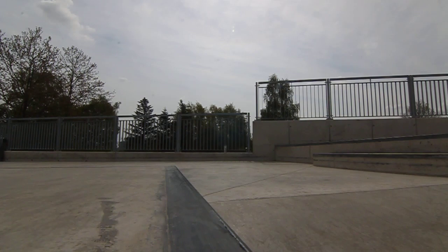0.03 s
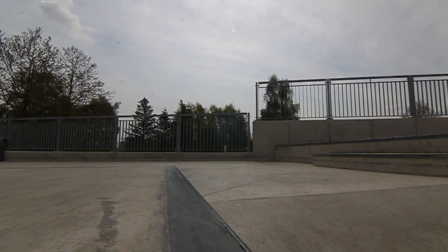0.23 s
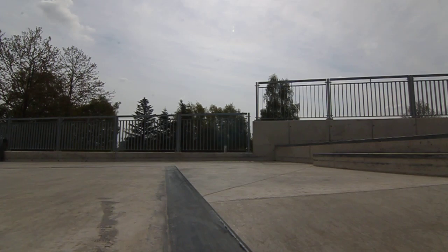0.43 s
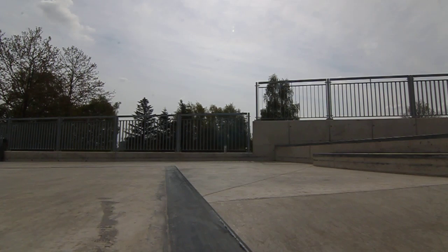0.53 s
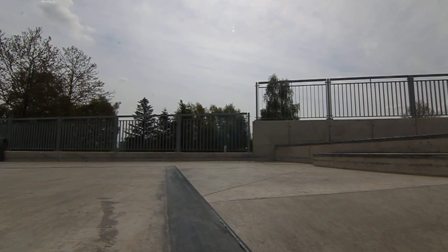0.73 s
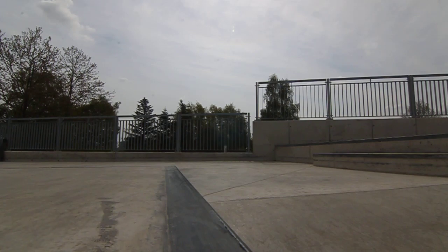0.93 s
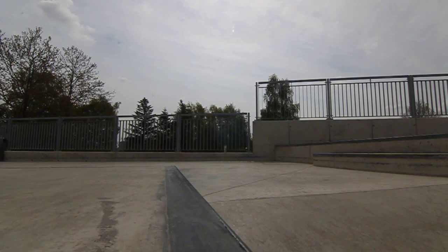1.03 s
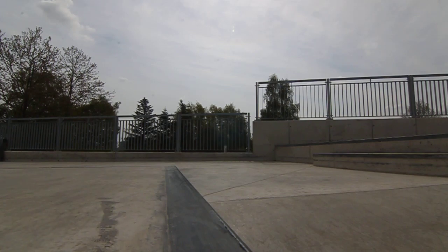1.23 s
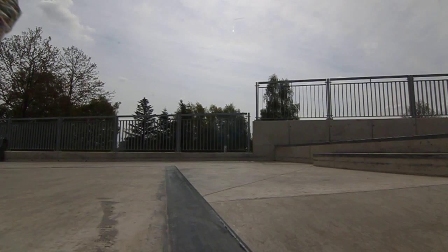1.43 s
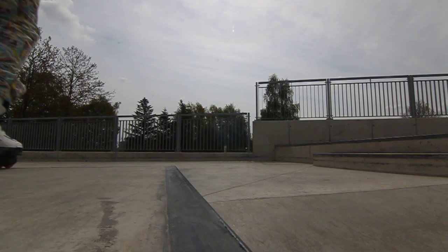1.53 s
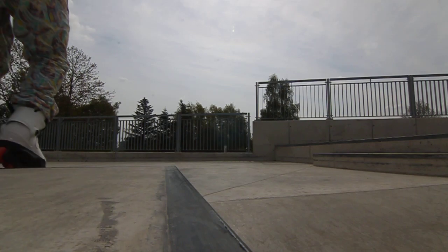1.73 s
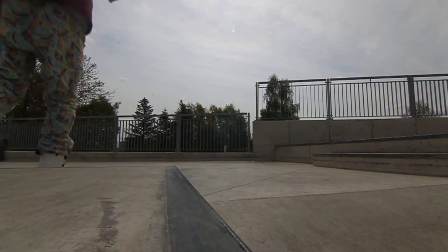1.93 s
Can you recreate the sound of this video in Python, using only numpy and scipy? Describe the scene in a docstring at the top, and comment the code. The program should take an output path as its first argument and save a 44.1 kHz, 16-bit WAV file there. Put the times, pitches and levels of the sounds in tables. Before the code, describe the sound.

Skate wheels roar across smooth concrete, clack over a joint, kick off and slam down outdoors

```python
"""Inline skate wheels roar over smooth concrete with crackling grit and a faint low rumble of wind.
The skates bump over a joint, scuff sideways, kick off in a jump and slap down one after the other.
A short squeak falls between the last blows; the loudest landing overloads the microphone.
Roar, grit and scuffs are filtered random grains, blows are damped modes plus noise, and the squeak
is a rough tone. Blows and squeak also scatter weakly from the park; wind and hush are filtered noise."""
import sys
import numpy as np
from scipy import signal
from scipy.fft import rfft, irfft
from scipy.io import wavfile
from scipy.ndimage import uniform_filter1d

SR = 44100
rng = np.random.default_rng(int(sys.argv[2]) if len(sys.argv) > 2 else 0)


def inscribe(sig):
    """Save sig as 16-bit PCM at rate SR to the path in sys.argv[1].

    A 1-D sig is mono; a 2-D sig holds one channel per row.
    Samples are clipped to [-1, 1] before scaling.
    """
    pcm = np.round(np.clip(np.atleast_2d(sig).T, -1, 1) * 32767)
    wavfile.write(sys.argv[1], SR, pcm.astype(np.int16))


N = 88200
T = np.arange(N) / SR


def undb(db):
    """Decibels to gain."""
    return 10 ** (np.asarray(db) / 20)


def unit(x):
    """Scale to rms 1."""
    return x / np.sqrt(np.mean(x ** 2))


def curve(table, axis=1):
    """One column of a table, joined by straight lines in time."""
    rows = np.array(table)
    return np.interp(T, rows[:, 0], rows[:, axis])


def colour(x, points):
    """Shape a sound with a spectrum of (Hz, dB) points, straight in log frequency; rms 1."""
    hz, db = np.array(points).T
    f = np.fft.rfftfreq(N, 1 / SR) + 1e-6
    gain = undb(np.interp(np.log(f), np.log(hz), db))
    return unit(irfft(rfft(x) * gain, N))


def band(x, hz, width_hz):
    """A resonance applied twice, for steep skirts; rms 1."""
    f = np.fft.rfftfreq(len(x), 1 / SR) + 1e-6
    detuning = (f - hz * hz / f) / width_hz
    return unit(irfft(rfft(x) / (1 + detuning ** 2), len(x)))


def noise(size=N):
    """White noise."""
    return rng.standard_normal(size)


def walk(rate_hz, size=N):
    """Smooth random wander, rms 1: noise averaged twice over 1 / rate."""
    k = max(int(SR / rate_hz), 1)
    return unit(uniform_filter1d(uniform_filter1d(noise(size), k), k))


def grains(per_s, spread_db, size=N):
    """Random tiny contacts of uneven size and either sign."""
    hit = rng.random(size) < per_s / SR
    sign = np.sign(noise(size))
    return hit * sign * undb(spread_db * noise(size))


def fade(age, t60_s):
    """Exponential decay from age 0, down 60 dB after t60."""
    return np.exp(-np.log(1000) * np.maximum(age, 0) / t60_s)


def ring(age, modes, ratio):
    """Damped modes struck at age 0, neighbours in opposite directions; ratio scales their pitch."""
    age = np.maximum(age, 0)
    total = 0
    for k, (hz, db, t60_s) in enumerate(modes):
        tone = np.sin(2 * np.pi * hz * ratio * age)
        total = total + (-1) ** k * undb(db) * fade(age, t60_s) * tone
    return total


def add(out, start_s, x):
    """Mix a short sound in at its start time."""
    i = int(start_s * SR)
    out[i:i + len(x)] += x[:N - i]


# Wheel roar on concrete. Each row: time in seconds, level in dB.
ROLL_LEVEL = [(.04, -29.5), (.25, -30), (.65, -31.5), (.95, -30.5), (1.33, -30.5), (1.39, -35.5),
              (1.5, -35), (1.61, -32), (1.68, -36.5), (1.76, -38.5), (1.82, -42), (1.89, -40), (1.95, -34),
              (2.0, -37)]
# Roar spectrum. Each row: frequency in Hz, relative level in dB.
ROLL_SPECTRUM = [(60, -17), (130, -17), (210, -6), (330, -5.5), (520, -2.5), (650, -3.5), (850, 0.5),
                 (1250, 1), (1550, -5.5), (2200, -9), (2800, -11.5), (4000, -19.5), (6500, -40),
                 (16000, -39)]
# Fine grit under the wheels. Each row: time in seconds, level in dB.
GRIT_LEVEL = [(.04, -42), (.13, -41.5), (.18, -37), (.28, -38.5), (.37, -44), (.48, -46), (.58, -41.5),
              (.67, -47.5), (.8, -43), (.95, -47.5), (1.33, -46.5), (1.39, -55), (1.55, -57), (1.75, -54.5),
              (1.91, -55.5), (1.96, -49.5), (2.0, -51)]
# Grit spectrum. Each row: frequency in Hz, relative level in dB.
GRIT_SPECTRUM = [(1200, 3), (2500, 1.5), (5000, 4.5), (7500, 0.5), (11000, 0), (16000, -8)]
ROLL_GRAINS_PER_S, ROLL_SPREAD_DB, ROLL_FLUTTER_DB = 12000, 2.5, .5
GRIT_PER_S, GRIT_SPREAD_DB = 4000, 1.5


def rolling():
    """The grain of the concrete drums the wheels; fine grit crackles on top."""
    roar = colour(grains(ROLL_GRAINS_PER_S, ROLL_SPREAD_DB), ROLL_SPECTRUM)
    roar_db = curve(ROLL_LEVEL) + ROLL_FLUTTER_DB * walk(61)
    grit = colour(grains(GRIT_PER_S, GRIT_SPREAD_DB), GRIT_SPECTRUM)
    return roar * undb(roar_db) + grit * undb(curve(GRIT_LEVEL))


# Low wind rumble. Each row: time in seconds, level in dB.
WIND_LEVEL = [(.04, -41.5), (1.3, -42.5), (1.4, -49), (2.0, -49)]
# Rumble spectrum. Each row: frequency in Hz, relative level in dB.
WIND_SPECTRUM = [(20, -32), (42, -12), (53, -7), (60.5, -3), (68, -10.5), (130, -8), (300, -22.5),
                 (2000, -70)]
# Distant outdoor hush. Each row: frequency in Hz, relative level in dB.
DISTANT_SPECTRUM = [(50, -56), (100, 4), (160, 4.5), (300, -7), (1000, -3), (4000, -56)]
DISTANT_DB = -46.5
BUFFET_S, BUFFET_WIDTH_S, BUFFET_HZ, BUFFET_DB = 1.965, 0.0057, 122, -27


def wind():
    """A faint low rumble, the distant outdoor hush, and one soft buffet from the passing skate."""
    rumble = colour(noise(), WIND_SPECTRUM) * undb(curve(WIND_LEVEL))
    hush = undb(DISTANT_DB) * colour(noise(), DISTANT_SPECTRUM)
    age = T - BUFFET_S
    swell = np.exp(-(age / BUFFET_WIDTH_S) ** 2)
    buffet = undb(BUFFET_DB) * swell * np.sin(2 * np.pi * BUFFET_HZ * age)
    return rumble + hush + buffet


# Skates striking the ground. Each row: start in seconds, frame ring in dB, frame pitch ratio,
# crack in dB, crack centre in Hz, thump in dB, thump pitch in Hz, crushed grit in dB.
BLOWS = [(0.693, -18.5, 1.2, -23.5, 2760, -17.5, 208, -57),
         (0.6966, -15.5, 1.07, -32.5, 3800, -14, 190, -38), (0.7821, -37, 1.17, -28, 3000, -35, 300, -53),
         (1.3224, -15, 1.3, -15.5, 2760, -9.5, 286, -37), (1.3483, -12, 1.14, -13.5, 2720, -1, 292, -30),
         (1.3569, -29, 1.6, -34, 2000, -16.5, 194, -54), (1.565, -26, 1.1, -34, 3100, -55, 300, -41),
         (1.621, 0.5, 0.99, -9, 2740, -10.5, 222, -32.5), (1.6365, -31, 1.7, -42, 2000, -30, 250, -60),
         (1.6524, -24, 1.26, -39, 3000, -24, 250, -58), (1.7235, -9.5, 1.06, -14.5, 2950, -11.5, 372, -53),
         (1.751, -28, 1.1, -54, 3000, -41, 300, -65), (1.756, -47, 1.1, -36.5, 4000, -30, 300, -63),
         (1.7865, -32, 1.2, -33.5, 3200, -25, 220, -45)]
# Wheel, frame and boot shell. Each row: frequency in Hz at ratio 1, level in dB, t60 in seconds.
FRAME_MODES = [(420, -9.5, .02), (737, -2, 0.022), (978, 0.5, 0.013), (1373, -2.5, 0.02),
               (2030, -14.5, 0.017), (2626, -8, 0.013), (3370, -22, 0.027), (5520, -15.5, 0.02),
               (7400, -38, .016)]
CRACK_HOLD_S, CRACK_T60_S, CRACK_WIDTH_RATIO = 0.0012, 0.018, 0.87
THUMP_LAG_S, THUMP_RISE_S, THUMP_T60_S = 0.00253, 0.00094, 0.024
BOOT_OVERTONE_RATIO, BOOT_OVERTONE_DB = 2, -15


def blows():
    """The wheels crack on the concrete and ring the frame; the boot thumps as the weight follows."""
    out = np.zeros(N)
    age = T[:2048]
    late = np.maximum(age - THUMP_LAG_S, 0)
    thump_rise = 1 - np.exp(-late / THUMP_RISE_S)
    # frequencies are multiples of the thump pitch
    boot = [(1, 0, THUMP_T60_S), (BOOT_OVERTONE_RATIO, BOOT_OVERTONE_DB, THUMP_T60_S)]
    for start_s, ring_db, ratio, crack_db, crack_hz, thump_db, thump_hz, grit_db in BLOWS:
        frame = undb(ring_db) * ring(age, FRAME_MODES, ratio)
        contact = undb(crack_db) * band(noise(len(age)), crack_hz, crack_hz * CRACK_WIDTH_RATIO)
        crushed = undb(grit_db) * band(noise(len(age)), 10700, 6900)
        crack = (contact + crushed) * fade(age - CRACK_HOLD_S, CRACK_T60_S)
        thump = -undb(thump_db) * ring(late, boot, thump_hz) * thump_rise
        add(out, start_s, frame + crack + thump)
    return out


PARK_DB, PARK_T60_S, PARK_HZ = -36, 0.14, 1210


def park(x):
    """Weak, short scatter from ramps and ledges: convolution with decaying band noise."""
    age = T[:16384]
    echo = band(noise(len(age)), PARK_HZ, 3 * PARK_HZ) * fade(age, PARK_T60_S)
    return undb(PARK_DB) * signal.fftconvolve(x, echo / np.linalg.norm(echo))[:N]


# Wheels sliding sideways. Each row: start in seconds, length in seconds, level in dB,
# centre in Hz, width in Hz.
SCUFFS = [(0.734, .055, -42.5, 4700, 6000), (0.849, 0.047, -41.5, 3820, 3000),
          (0.851, .01, -37, 11000, 3500), (.89, 0.51, -45.5, 2830, 1790), (1.056, 0.1, -48, 10500, 3500),
          (1.568, 0.11, -43, 3100, 3470), (1.57, .056, -50, 12000, 4000), (1.676, 0.074, -38.5, 4700, 2800),
          (1.676, 0.042, -43.5, 9350, 3500), (1.803, 0.019, -47, 4270, 4000)]
SCUFF_ATTACK_S, SCUFF_RELEASE_SHARE = 0.0021, 0.34
SCUFF_CHATTER_DB, SCUFF_CHATTER_HZ = 3.45, 590


def scuffs():
    """Each slide is a chattering patch of denser grit that starts fast and tapers off."""
    out = np.zeros(N)
    age = T[:24000]
    for start_s, length_s, db, hz, width_hz in SCUFFS:
        attack = np.clip(age / SCUFF_ATTACK_S, 0, 1)
        release = np.clip((length_s - age) / (length_s * SCUFF_RELEASE_SHARE), 0, 1) ** .5
        chatter_db = SCUFF_CHATTER_DB * walk(SCUFF_CHATTER_HZ, size=len(age))
        scrape = band(grains(7000, spread_db=5, size=len(age)), hz, width_hz)
        add(out, start_s, undb(db + chatter_db) * attack * release * scrape)
    return out


# Small metallic tick. Each row: frequency in Hz at ratio 1, level in dB, t60 in seconds.
TICK_MODES = [(5700, -9, .012), (10200, -3, 0.015), (10900, 4, 0.014), (14100, -6, 0.048)]
TICK_S, TICK_DB, TICK_PITCH_RATIO = .8535, -27.5, 0.92


def tick():
    """One light metallic tick: a few high damped modes."""
    out = np.zeros(N)
    add(out, TICK_S, undb(TICK_DB) * ring(T[:2048], TICK_MODES, TICK_PITCH_RATIO))
    return out


# A wheel squeals as it grips. Each row: time in seconds, pitch in Hz, level in dB.
SQUEAK = [(1.68, 3400, -43), (1.704, 3520, -45), (1.708, 4110, -35), (1.714, 4430, -34), (1.717, 3120, -30),
          (1.723, 3450, -37), (1.726, 3400, -60)]
SQUEAK_ROUGH_SHARE, SQUEAK_ROUGH_HZ, SQUEAK_OCTAVE_DB = 0.0443, 1460, -10


def squeak():
    """Stick-slip of a wheel: a rough, wavering tone with its octave."""
    pitch_hz = curve(SQUEAK) * (1 + SQUEAK_ROUGH_SHARE * walk(SQUEAK_ROUGH_HZ))
    phase = 2 * np.pi * np.cumsum(pitch_hz) / SR
    tone = np.sin(phase) + undb(SQUEAK_OCTAVE_DB) * np.sin(2 * phase)
    sounding = (T > SQUEAK[0][0]) & (T < SQUEAK[-1][0])
    return sounding * undb(curve(SQUEAK, axis=2)) * tone


def scene():
    """Rolling, slides and blows in the open air; blows, tick and squeak scatter from the park."""
    hits = blows() + tick() + squeak()
    return (rolling() + wind() + hits + park(hits) + scuffs())[None]


START_S, LOW_CUT_HZ, CEILING, TOP_HZ = .036, 59, .73, 15750


def record(dry):
    """Cut the deepest bass, stay silent until the start, flatten the loudest peaks, cut the top."""
    low_cut = signal.butter(2, LOW_CUT_HZ, "high", fs=SR, output="sos")
    x = signal.sosfilt(low_cut, dry) * (T > START_S)
    clipped = x / (1 + (x / CEILING) ** 6) ** (1 / 6)
    top_cut = signal.ellip(10, .2, 80, TOP_HZ, fs=SR, output="sos")
    return signal.sosfilt(top_cut, clipped)


dry = scene()
out = record(dry)
inscribe(out)
```